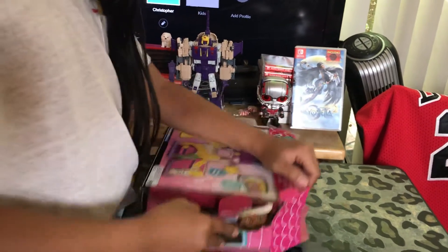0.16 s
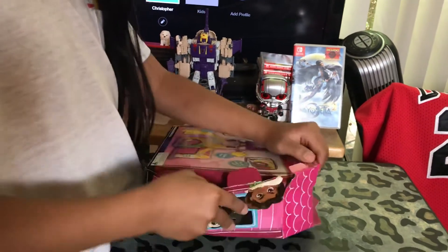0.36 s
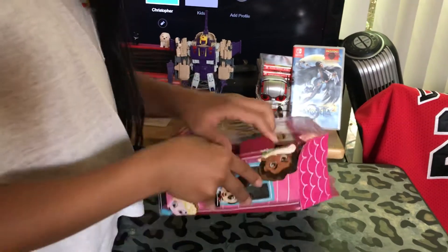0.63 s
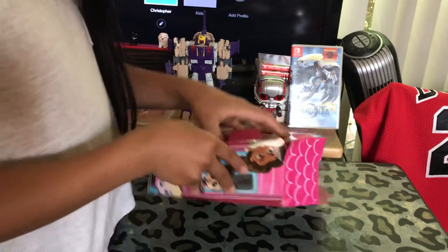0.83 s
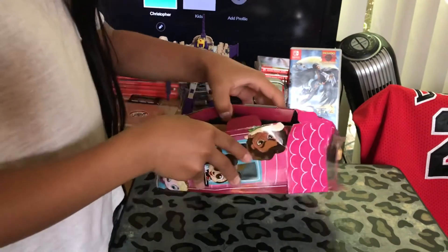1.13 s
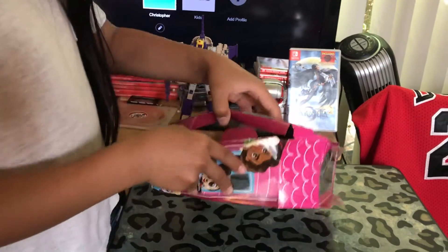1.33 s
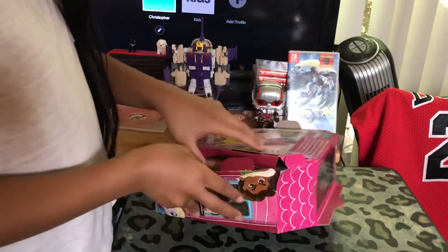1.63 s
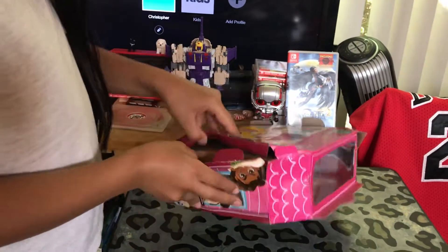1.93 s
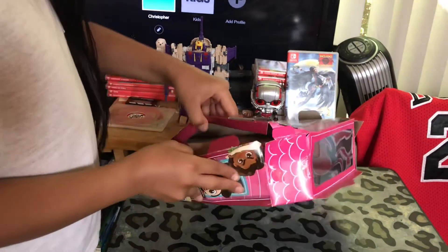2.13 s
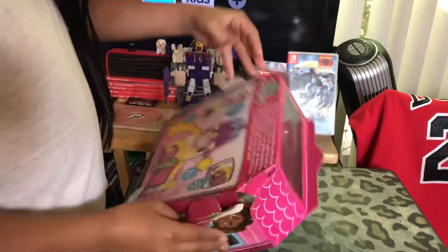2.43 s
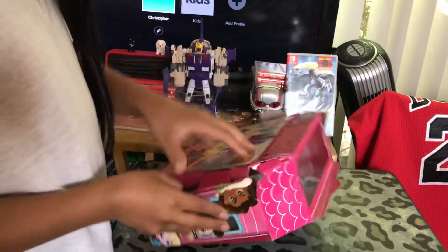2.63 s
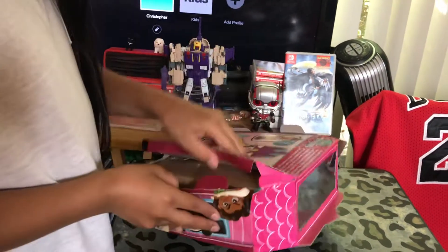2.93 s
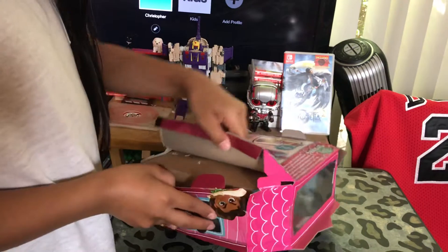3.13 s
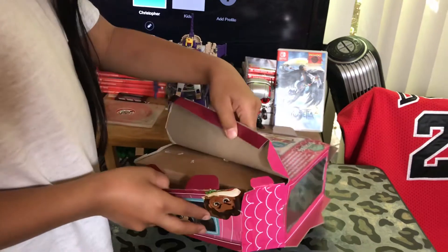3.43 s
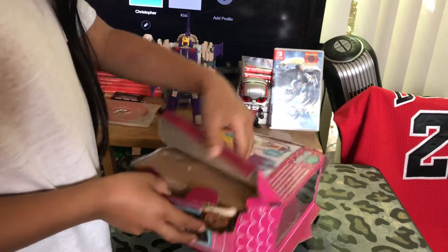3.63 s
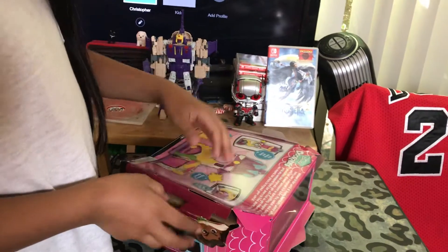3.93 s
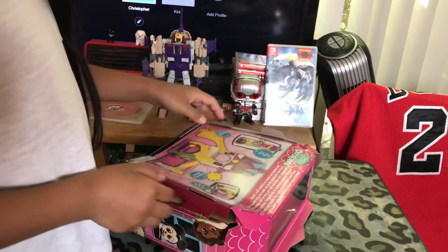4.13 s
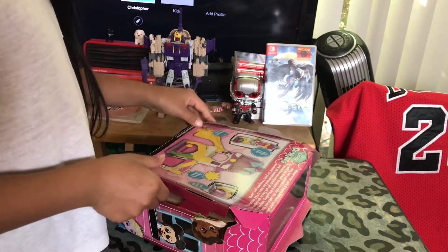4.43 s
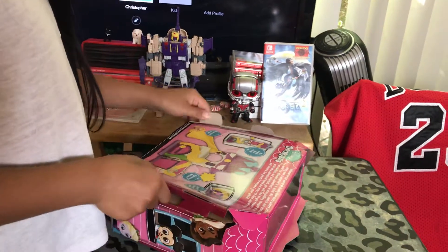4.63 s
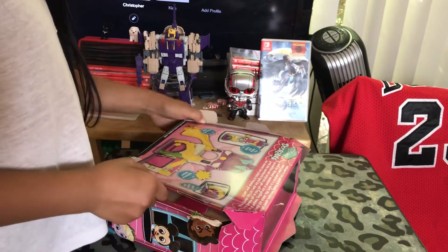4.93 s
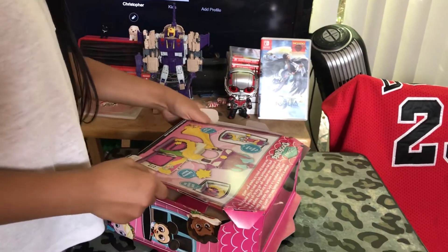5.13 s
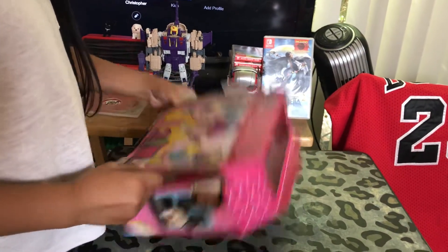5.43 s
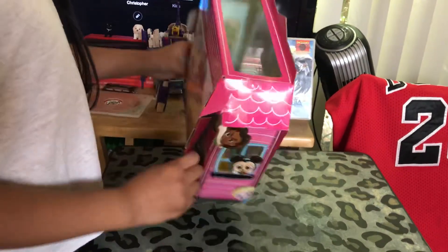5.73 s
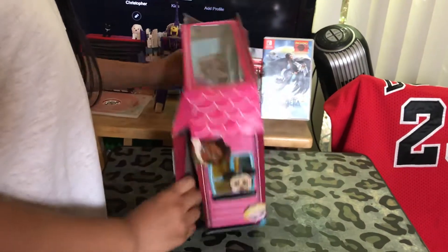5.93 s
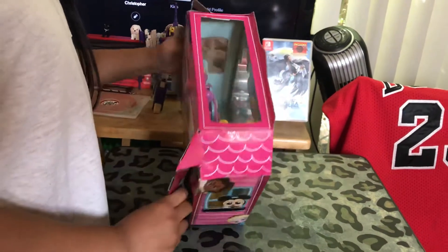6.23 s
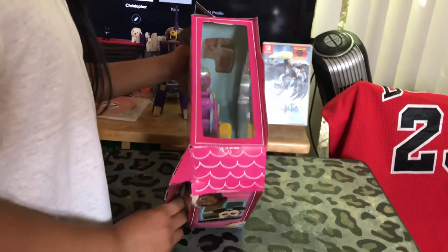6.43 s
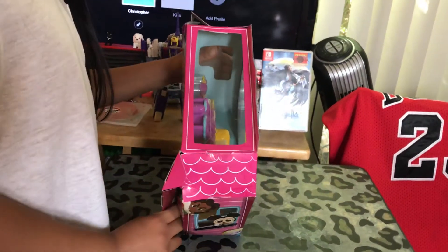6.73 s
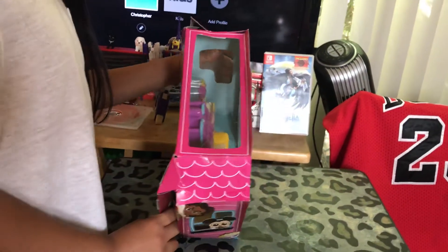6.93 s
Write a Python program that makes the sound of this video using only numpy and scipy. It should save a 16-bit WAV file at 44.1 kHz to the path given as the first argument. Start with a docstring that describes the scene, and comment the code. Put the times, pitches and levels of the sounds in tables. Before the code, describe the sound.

A light, hollow carton is handled on a cloth-covered table. Busy, boxy knocks and dry scraping come first, briefly thinning before a violent burst of cardboard snaps. A glued flap then gives way with fine, crisp ripping and one more crack. The movements become gentle: sparse clicks, skin sliding on card, thin film crinkles and muted bumps. Close single microphone, very short room reflection, steady quiet background.

```python
"""Small furnished room, cloth-covered table: hands turn a hollow cardboard box over, pry at it, tear a glued flap.
Knocks: a click and scattered slips ring panel, hollow and table modes. Snaps: millisecond noise bursts, each pitched.
Handling: random stick-slip grains ring the box and rustle as skin, film and fibres; the table rumbles.
A 35 ms decaying noise tail is the room; steady coloured noise is the quiet floor."""
import sys
import numpy as np
from scipy import signal
from scipy.fft import rfft, irfft
from scipy.io import wavfile

SR = 44100
rng = np.random.default_rng(int(sys.argv[2]) if len(sys.argv) > 2 else 0)


def wav_record(signal):
    """Record a signal, one row per channel, as 16-bit PCM in the file named by sys.argv[1]."""
    frames = np.transpose(np.atleast_2d(signal))
    bounded = np.clip(frames, -1, 1)
    # unit amplitude maps onto the largest positive 16-bit level
    quanta = np.round(bounded * 32767).astype(np.int16)
    wavfile.write(sys.argv[1], SR, quanta)


N = 311787

# quiet floor spectrum, relative: pitch_hz, density_db_per_hz
FLOOR_SPECTRUM = [(18, -41), (30, -12), (56, -13.5), (98, -6), (145, -22), (258, -16), (1090, -25.5),
                  (1270, -28), (1380, -31), (3640, -38.5), (10400, -45.5), (12800, -41), (15800, -45)]
# table rumble over time: time_s, level_db
RUMBLE_LEVEL = [(0.0, -64), (0.77, -66), (2.171, -74), (2.419, -59), (3.309, -74.5), (6.63, -62),
                (7.07, -70)]
# table top under the cloth, relative levels: mode_hz, level_db, t60_s
TABLE_MODES = [(55.3, -11, 0.36), (74.6, 0.5, 0.184), (98, -10, 0.26), (146.3, -5.5, 0.19),
               (174.6, 2, 0.065), (200, 0.5, 0.099)]
# air and walls of the box, relative levels: mode_hz, level_db, t60_s
HOLLOW_MODES = [(258, -7.5, 0.19), (310, 6, 0.063), (390.5, -18, 0.19), (412.2, 0, 0.077),
                (465.7, -3, 0.054), (519, -3, 0.057), (526, -9, 0.031), (636, -6.5, 0.06)]
# stiffer box panels, relative levels: mode_hz, level_db, t60_s
PANEL_MODES = [(685, 0, 0.013), (795, -5.5, 0.05), (843, -12.5, 0.041), (848, -14, 0.15), (915, 1.5, 0.034),
               (1010, -9, 0.079), (1100, 0, 0.033), (1197, -1, 0.023), (1282, -12, 0.07), (1410, -7, 0.026),
               (1515, 8, 0.0067), (1620, -8, 0.049), (1790, 2.5, 0.013), (1862, -6, 0.022),
               (1999, 2, 0.021), (2173, -5, 0.046), (2274, -3.5, 0.014), (2520, -12, 0.012),
               (3040, -21.5, 0.014), (3520, -16, 0.0056)]
# spectrum of snaps and rustle, relative: pitch_hz, density_db_per_hz
BRIGHT_SPECTRUM = [(1290, -30.5), (2200, -1.5), (2840, -3.5), (3460, -5), (3950, -5), (6220, -2),
                   (6920, -4.5), (9400, -5.5), (10400, -9), (11600, -7), (13100, -8.5), (15000, -13),
                   (15800, 4.5)]
# pitch at which the rubbed panel answers best as hands move: time_s, pitch_hz
RUBBED_PITCH = [(0, 1100), (3.8, 1100), (4.0, 2100), (4.6, 1000), (5.2, 1200), (5.5, 2165), (6.35, 2034),
                (6.6, 888), (6.85, 1800), (7.07, 1800)]
# strokes of fingers or flap over card; swell and fade are times for 20 dB:
# peak_s, swell_s, fade_s, panels_db, hollow_db, skin_db, film_db, fibres_db
STROKES = [(0.06, 0.056, 0.034, -40.5, -32.5, -54, -52.5, -45),
           (0.237, 0.1, 0.24, -50, -46.5, -58.5, -57.5, -54.5),
           (.31, 0.077, 0.052, -57, -49.5, -63, -64, -67), (.405, 0.0084, 0.052, -51, -43, -56, -68, -68),
           (.46, 0.048, 0.26, -57, -49, -55, -63, -47.5), (0.635, 0.021, 0.058, -40, -40.5, -47, -49, -40),
           (.82, 0.068, .12, -47.5, -44, -55, -58, -75), (.95, 0.055, 0.15, -50, -39.5, -71, -60, -68),
           (1.046, 0.12, 0.051, -35, -59, -41.5, -46, -35),
           (1.3, 0.063, 0.081, -59.5, -56.5, -90, -72, -76), (1.542, 0.088, 0.12, -43, -44, -51, -52, -43),
           (1.653, 0.03, 0.053, -52, -47.5, -56.5, -66, -48),
           (1.792, 0.03, 0.058, -43, -39, -51.5, -56, -54), (1.869, 0.062, 0.036, -42, -36, -51, -65, -68),
           (1.921, 0.044, 0.069, -48.5, -60, -68, -62, -69), (2.1, 0.59, 0.54, -55, -52.5, -61, -65.5, -68),
           (2.3, 0.047, 0.13, -30.5, -49, -37, -45, -42), (2.399, 0.31, 0.094, -68, -44.5, -71, -74, -42.5),
           (2.62, 0.1, 0.084, -47.5, -40, -57, -58, -56.5), (2.885, 0.1, 0.11, -53.5, -43, -58, -63, -50.5),
           (2.977, 0.076, 0.065, -41.5, -39, -52, -51, -44), (3.1, 0.067, 0.14, -53.5, -53, -61, -55, -54),
           (3.21, 0.021, 0.48, -50, -57, -69, -57, -39.5), (3.29, 0.024, 0.054, -54, -48, -63, -41, -24),
           (3.369, 0.14, 0.044, -49, -52, -52, -37, -30), (3.454, .02, 0.027, -51, -67, -58, -47.5, -33.5),
           (3.699, 0.081, 0.027, -63, -35.5, -73, -62, -80),
           (3.641, 0.096, 0.23, -56.5, -55, -61, -59, -74),
           (3.824, 0.045, 0.051, -38, -32.5, -45, -54, -73), (4.006, 0.1, 0.043, -55.5, -62, -56, -54, -46),
           (4.199, 0.019, 0.13, -62, -53, -58.5, -61, -57), (4.317, 0.03, 0.019, -61, -53, -65.5, -63, -57),
           (4.379, 0.006, 0.034, -48.5, -48.5, -68, -72.5, -59),
           (4.721, 0.43, 0.6, -60.5, -62, -75, -66.5, -70.5),
           (4.828, 0.0095, 0.11, -57, -75, -61, -50.5, -69),
           (4.881, 0.035, 0.024, -53.5, -47, -57, -48, -46),
           (5.02, 0.16, 0.58, -57, -53.5, -58.5, -57.5, -72), (5.149, 0.06, 0.022, -45, -53, -61, -72, -78),
           (5.41, 0.045, 0.071, -46, -46.5, -67.5, -54, -51),
           (5.54, 0.21, 0.12, -55, -54, -54.5, -55, -47.5),
           (5.762, 0.23, 0.55, -57.5, -57.5, -62.5, -60, -54),
           (5.896, 0.061, 0.09, -50, -62, -54, -65, -47.5),
           (6.083, 0.022, 0.028, -53.5, -52, -57.5, -53, -46.5),
           (6.15, 0.068, 0.044, -60, -55, -70, -74, -72), (6.301, 0.27, 0.24, -54, -58, -58, -56.5, -55),
           (6.54, 0.11, 0.27, -55, -49.5, -67, -61, -57), (6.79, 0.11, 0.065, -53.5, -56.5, -69, -82, -57),
           (6.92, 0.22, 0.28, -55, -52, -70, -59, -51.5), (7.04, 0.11, 0.35, -54, -53, -72, -64, -55)]
# hands at rest: panels_db, hollow_db, skin_db, film_db, fibres_db
RESTING_DB = (-89.5, -75.5, -84, -93, -81.5)
# knocks on the box, levels before drive; hollow and thud relative to level_db:
# start_s, level_db, hollow_db, thud_db, contact_ms, favoured_panel_hz, favoured_hollow_hz
KNOCKS = [(0.021, -40, -20, -12, 3.8, 1660, 412), (0.043, -20, -3.5, -14.5, 5.3, 830, 304),
          (0.21, -42.5, 1, -11, 6.3, 834, 403), (0.311, -34, -20, -27, 5, 826, 312),
          (0.389, -24, -4.5, -12, 7.8, 703, 310), (0.431, -16, -42, -29, 2.7, 1100, 366),
          (0.465, -35, -9, -7.5, 4.9, 1100, 296), (0.486, -34, -5, -12, 7.3, 1100, 396),
          (0.538, -37, -6, -16, 3.2, 750, 415), (0.611, -35, -21, -21, 2.55, 1380, 301),
          (0.62, -32, -20, -20, 6.1, 988, 474), (0.698, -44.5, -1, -15, 7.8, 720, 425),
          (0.754, -34.5, -1.5, -14, 12, 972, 500), (0.774, -19, -16, -26.5, 12.5, 1140, 330),
          (0.823, -28, -3, -7, 3.6, 1010, 301), (0.872, -52, 18.5, -3, 3.9, 915, 415),
          (0.918, -12, -12.5, -29, 2.6, 760, 638), (1.038, -18.5, -10, -20, 3.7, 1000, 285),
          (1.062, -13.5, -5, -24.5, 5.5, 1010, 404), (1.392, -48.5, 2, -3, 3.9, 859, 242),
          (1.438, -35, -1, -9.5, 8.8, 1230, 440), (1.498, -34, -10, -24, 5.4, 1540, 334),
          (1.51, -28, -12, -44, 2.5, 1600, 404), (1.536, -32.5, -26, -33, 3.8, 2000, 546),
          (1.756, -37.5, -5, -14, 1.7, 1050, 515), (1.841, -37.5, 7.5, -32, 5.3, 708, 550),
          (1.858, -22.5, -3.5, -39, 4.4, 2250, 447), (1.897, -29.5, -0.5, -36, 9, 703, 474),
          (1.911, -22, -12, -49, 3.1, 2290, 312), (1.934, -41, 3, -30, 2.6, 716, 316),
          (2.234, -20, -15, -34, 3.9, 1260, 410), (2.264, -16, -13, -11, 12, 888, 581),
          (2.274, 2.5, -14.5, -34, 3.9, 880, 285), (2.312, -4.5, -18, -19.5, 6.8, 1600, 398),
          (2.35, -28, 3, -12, 6.5, 1240, 307), (2.428, -22, -4.5, -30, 9.5, 870, 310),
          (2.567, -10, -1, -20, 12, 1140, 620), (2.676, -26.5, -7.5, -22.5, 12, 700, 380),
          (2.74, -39.5, -4.5, -35, 7.4, 2520, 468), (3.031, -3.5, -6, -49, 1.7, 830, 470),
          (3.184, -36.5, -34, -36, 1.9, 2110, 638), (3.207, -35, -14, -30, 3.7, 1590, 624),
          (3.278, -36, -22, -22, 3.1, 1740, 310), (3.318, -23.5, -15.5, -22, 3.4, 1070, 407),
          (3.589, -39, -11, -13, 2.4, 2140, 554), (3.66, -12.5, -11.5, -28.5, 1.64, 1010, 475),
          (3.77, -40, -22, -24, 3.8, 2040, 635), (3.785, -37, -23, -16, 2.8, 794, 310),
          (3.819, -37, -21, -10, 6.2, 1040, 310), (4.124, -35.5, -4, -31, 2.7, 2420, 377),
          (4.135, -45, 5, -32, 3.2, 2170, 398), (4.19, -42, -5, -25.5, 4.3, 1360, 300),
          (4.268, -41, -9, -30, 6.7, 807, 310), (4.683, -35, -8.5, -30, 6.3, 704, 540),
          (4.768, -44.5, -5, -1, 5.8, 1360, 288), (4.932, -36.5, -24, -17, 18, 2360, 248),
          (4.972, -34.5, -26, -17, 9.3, 853, 326), (5.02, -44, -19, -29, 2.3, 1790, 563),
          (5.13, -39.5, -4.5, -19, 5.2, 1160, 301), (5.285, -38, -16, -45, 5.3, 1350, 239),
          (5.406, -25, -12, -21, 2.1, 824, 314), (5.537, -30.5, -35, -40, 1.2, 2220, 406),
          (5.592, -34.5, -14, -36.5, 4.4, 870, 310), (5.895, -51.5, -17.5, -12, 2.5, 1580, 320),
          (6.051, -47, 0, -15, 2.1, 738, 401), (6.084, -34.5, -2.5, -15, 6.6, 840, 406),
          (6.134, -39, -0.5, -23, 6.4, 713, 390), (6.199, -53, 9.5, -22, 1.5, 848, 416),
          (6.24, -54, 9.5, -13, 1.3, 786, 541), (6.278, -55.5, 15, -22, 1.3, 1100, 540),
          (6.348, -45, 7, -34, 3.4, 713, 436), (6.383, -29, 4, -15, 4.5, 710, 516),
          (6.41, -50, -16, -21, 3, 864, 484), (6.5107, -25, -8, -13, 5.6, 840, 476)]
# snaps of fibres, glue and film, levels before drive: start_s, level_db, pitch_hz, decay_ms
TICKS = [(0.047, -15, 3600, 4.9), (0.3113, -34, 7000, 3.4), (0.391, -33.5, 3810, 2.5),
         (0.431, -11.5, 3480, 4.3), (0.4884, -26.5, 7240, 3.9), (0.606, -27.5, 6400, 8.6),
         (0.7541, -25.5, 4040, 13), (0.7727, -17, 4200, 7.5), (0.847, -32.5, 3400, 3.9),
         (0.918, -21, 3820, 6.2), (1.0375, -18, 7100, 3.2), (1.0638, -12, 3660, 3.7),
         (1.4385, -30.5, 5460, 3.4), (1.51, -22, 4600, 2.6), (1.5345, -17.5, 7200, 12),
         (1.6393, -35, 9600, 3), (1.8593, -22, 4200, 1.4), (1.897, -29, 5200, 2.5),
         (1.9063, -20, 2930, 4.5), (2.2331, -6.5, 8500, 1.4), (2.2628, -6, 3900, 10),
         (2.2734, 0, 2640, 9.3), (2.311, -2.5, 5100, 6.6), (2.351, -22, 6350, 2.3), (2.424, -22, 5940, 9.1),
         (2.571, -17.5, 6130, 10), (2.676, -19.5, 4040, 7.2), (2.7438, -34.5, 3970, 2.5),
         (2.983, -25, 5950, 6), (3.0329, -23, 2330, 0.43), (3.1846, -22.5, 6160, 0.5),
         (3.213, -22, 11300, 1.4), (3.242, -22, 11300, 0.97), (3.267, -22, 8040, 7),
         (3.2818, -14, 7460, 2.9), (3.289, -20, 6340, 4.9), (3.301, -18, 5900, 6.8),
         (3.3454, -34, 6550, 3.8), (3.3588, -32, 6270, 2.5), (3.3687, -29, 5300, 1.8),
         (3.3832, -23, 6170, 2.4), (3.4, -26.5, 11900, 0.65), (3.504, -35, 5700, 0.73),
         (3.4241, -31, 6740, 2), (3.458, -27.5, 5980, 2.2), (3.49, -27, 6200, 2), (3.661, -16, 5230, 1.45),
         (3.771, -34.5, 4540, 3.4), (3.784, -26.5, 3000, 9.9), (3.8142, -24, 6020, 1.9),
         (3.84, -31, 2280, 1.5), (3.906, -41, 4960, 1.8), (3.998, -45, 2140, 3), (4.012, -34, 5900, 1.8),
         (4.125, -33.5, 2350, 2.5), (4.294, -47, 3000, 1), (4.137, -41, 6200, 3), (4.692, -38.5, 6500, 1.5),
         (4.2688, -40, 5350, 2.4), (4.385, -35, 5170, 2.1), (4.877, -41.5, 6000, 2),
         (4.842, -44, 2000, 1.5), (4.826, -34.5, 6600, 7.4), (4.933, -29.5, 3300, 7.3),
         (4.801, -45, 5500, 1.5), (4.948, -48, 6000, 0.8), (4.978, -25, 5900, 0.98),
         (5.107, -44, 6000, 1.2), (5.216, -41.5, 5600, 1.4), (5.378, -38, 5550, 1.5),
         (4.9715, -27, 6200, 2.3), (5.1315, -29.5, 5720, 2.7), (5.2565, -42.5, 5400, 4.4),
         (5.402, -28.5, 5170, 4.1), (5.431, -45, 9000, 1.5), (5.47, -33, 6560, 4), (5.62, -47, 7000, 1.5),
         (5.629, -43.5, 6970, 0.8), (5.7338, -40, 5700, 1.8), (6.504, -28, 2900, 4.8),
         (6.596, -33.5, 6300, 3), (6.921, -37, 6940, 1.8)]

FLOOR_DB = -62
ROOM_T60_S, ROOM_FIRST_S, ROOM_DB, ROOM_CUT_HZ = 0.035, 0.004, -21, 11000
GRIP_S = 0.04   # interval between changes of grip
SKIN_LOW_HZ, SKIN_HIGH_HZ = 1800, 4420
FILM_LOW_HZ, FILM_HIGH_HZ = 4960, 6760
FIBRE_CUT_HZ = 8700
# after a knock the card goes on shifting in the hands; loose card answers low
SHUDDER_PANEL_DB, SHUDDER_HOLLOW_DB, SHUDDER_FADE_S, SHUDDER_HZ = -22, -13, 0.05, 850
# after a snap the fibres go on rustling
AFTER_SKIN_DB, AFTER_FILM_DB, AFTER_FIBRE_DB, AFTER_FADE_S = -30, -31.5, -35, 0.041
PANEL_DRIVE_DB, HOLLOW_DRIVE_DB, THUD_DRIVE_DB, TICK_DRIVE_DB = -0.5, 3, 4, 17.5
THUD_DELAY_S = 0.0024
SOFT_PANEL_HZ, SOFT_HOLLOW_HZ = 3000, 1200   # soft fingertips: knocks carry little above
BASS_CUT_HZ, PEAK_LIMIT, TOP_STOP_HZ = 38, 0.93, 16100


def from_db(db):
    """Decibels to gain."""
    return 10 ** (np.asarray(db) / 20)


def rms_one(x):
    """Scale to rms 1."""
    return x / np.sqrt(np.mean(x ** 2) + 1e-20)


def energy_one(x):
    """Scale to energy 1."""
    return x / np.sqrt(np.sum(x ** 2))


def lowpass(x, order, cut_hz):
    """Butterworth low-pass."""
    return signal.lfilter(*signal.butter(order, cut_hz, fs=SR), x)


def highpass(x, cut_hz):
    """Second-order Butterworth high-pass."""
    return signal.lfilter(*signal.butter(2, cut_hz, "high", fs=SR), x)


def drift(rate_hz):
    """Slow chance: noise twice through a one-pole low-pass at a tenth of the sample rate; rms 1."""
    r = np.exp(-20 * np.pi * rate_hz / SR)
    noise = rng.standard_normal(N // 10 + 4002)
    slow = signal.lfilter([1], [1, -2 * r, r * r], noise)[4000:]   # drop the settling
    return np.interp(np.arange(N) / 10, np.arange(len(slow)), rms_one(slow))


def colour(x, spectrum):
    """Minimum-phase filter with the given spectrum; a unit click keeps energy 1."""
    hz, db = np.transpose(spectrum)
    grid_hz = np.maximum(np.arange(2049) * SR / 4096, 1)
    log_gain = np.interp(np.log(grid_hz), np.log(hz), db) * np.log(10) / 20
    cepstrum = irfft(log_gain)
    cepstrum[1:2048] *= 2   # fold to make it causal
    cepstrum[2049:] = 0
    taps = irfft(np.exp(rfft(cepstrum)))
    return signal.fftconvolve(x, energy_one(taps))[:N]


def modes(force, table, since_s, vary_db, favoured_hz=None, focus_db=0):
    """A force rings all modes of a body; from each moment in since_s, grip and spot give new strengths."""
    table = np.array(table)
    part = np.searchsorted(np.asarray(since_s) * SR, np.arange(N), side="right") - 1
    # the sign of vary_db only mirrors the chance
    strength_db = vary_db * rng.standard_normal((len(since_s), len(table)))
    if favoured_hz is not None:   # focus_db lost per octave from the favoured pitch
        octaves = np.abs(np.log2(table[:, 0] / favoured_hz[:, None]))
        strength_db -= focus_db * octaves
    mean_power = np.mean(from_db(2 * strength_db), axis=1, keepdims=True)
    strengths = from_db(strength_db) / np.sqrt(mean_power)
    out = 0
    for k, (hz, db, t60_s) in enumerate(table):
        r = from_db(-60 / (t60_s * SR))
        w = 2 * np.pi * hz / SR
        struck = from_db(db) * strengths[part, k] * force + 1e-18
        out = out + signal.lfilter([0, np.sin(w)], [1, -2 * r * np.cos(w), r * r], struck)
    out = highpass(out, 1.4 * table[0, 0])   # little is radiated low down
    return out / np.sqrt(np.sum(from_db(2 * table[:, 1])))


def bursts(start_s, level_db, decay_ms, first):
    """Each contact is a first click plus a dying scatter of slips; energy 1 before its level gain."""
    size = 2000
    out = np.zeros(N + size)
    t = np.arange(size) / SR
    scatter = rng.standard_normal((len(start_s), size)) ** 3   # cubed: sparse, spiky
    for s, db, ms, slips in zip(start_s, level_db, decay_ms, scatter):
        push = energy_one(slips * np.exp(-1000 * t / np.clip(ms, .2, 20)))
        push[0] += first * np.sign(push[0])
        at = int(s * SR)
        out[at:at + size] += from_db(db) * energy_one(push)
    return out[:N]


def grains(per_s, spread_db, clump_db, clump_hz):
    """Stick-slip: random clicks of uneven size that come in clumps; rms 1."""
    sizes = from_db(spread_db * np.minimum(rng.exponential(1, N), 5))
    signs = rng.choice([-1, 1], N)
    born = rng.random(N) < per_s / SR
    return rms_one(sizes * signs * born * from_db(clump_db * drift(clump_hz)))


def creases(clicks, low_hz, high_hz, cycles, count):
    """Patches of different size crackle in turn; a click rings at its patch's pitch, 60 dB down after cycles."""
    out = 0
    dealt = rng.integers(0, count, N)
    for k, hz in enumerate(np.geomspace(low_hz, high_hz, count)):
        r = from_db(-60 * hz / (cycles * SR))
        mine = clicks * (dealt == k) * from_db(4.9 * drift(7.1))
        poles = [1, -2 * r * np.cos(2 * np.pi * hz / SR), r * r]
        out = out + signal.lfilter([1, 0, -1], poles, mine + 1e-18)
    return out


def emphasis(x, pitch_hz, share, breadth):
    """A broad resonance, centre held for 64 samples at a time, added to a share of the plain sound."""
    out, state = share * x, np.zeros(2)
    for i in range(0, N, 64):
        centre_hz = np.clip(pitch_hz[i], 1500, 14000)
        r = np.exp(-np.pi * breadth * centre_hz / SR)
        zeros = np.array([1, 0, -1]) * (1 - r * r) / 2
        poles = [1, -2 * r * np.cos(2 * np.pi * centre_hz / SR), r * r]
        rung, state = signal.lfilter(zeros, poles, x[i:i + 64], zi=state)
        out[i:i + 64] += rung
    return out


def swells(peak_s, swell_s, fade_s, level_db):
    """Power of movements that grow to a peak and fade, evenly in decibels; powers add."""
    step_s = np.arange(0, N + 32, 32)[:, None] / SR
    before = (peak_s - step_s) / np.clip(swell_s, .001, 2)
    after = (step_s - peak_s) / np.clip(fade_s, .001, 2)
    fall_db = 20 * np.maximum(before, after)
    power = np.sum(from_db(2 * (level_db - fall_db)), axis=1)
    return np.interp(np.arange(N) / SR, step_s[:, 0], power)


def quiet_floor():
    """Steady noise with the floor spectrum."""
    return from_db(FLOOR_DB) * colour(rng.standard_normal(N), FLOOR_SPECTRUM)


def room(x):
    """Dull noise tail that dies away, starting after the first reflection."""
    t = np.arange(SR // 2) / SR
    tail = rng.standard_normal(len(t)) * from_db(-60 * t / ROOM_T60_S) * (t > ROOM_FIRST_S)
    tail = lowpass(tail, 1, ROOM_CUT_HZ)
    return from_db(ROOM_DB) * signal.fftconvolve(x, energy_one(tail))[:N]


def table_rumble(grips_s):
    """Noise rings the table top's modes, with the level following the rumble table."""
    level_db = np.interp(np.arange(N) / SR, *np.transpose(RUMBLE_LEVEL))
    rumble = modes(rng.standard_normal(N), TABLE_MODES, grips_s, vary_db=4.5)
    return rms_one(rumble) * from_db(level_db)


def effort():
    """Gains of panels, hollow, skin, film, fibres from strokes, aftermaths and rest; last the panel shudder."""
    peak_s, swell_s, fade_s, *levels_db = np.transpose(STROKES)
    knock_s, knock_db, hollow_db = np.transpose(KNOCKS)[:3]
    tick_s, tick_db = np.transpose(TICKS)[:2]
    shudder = swells(knock_s, 0, SHUDDER_FADE_S, knock_db + SHUDDER_PANEL_DB)
    aftermaths = [0, swells(knock_s, 0, SHUDDER_FADE_S, knock_db + hollow_db + SHUDDER_HOLLOW_DB)]
    for after_db in (AFTER_SKIN_DB, AFTER_FILM_DB, AFTER_FIBRE_DB):
        aftermaths.append(swells(tick_s, 0, AFTER_FADE_S, tick_db + after_db))
    gains = []
    for db, aftermath, rest_db in zip(levels_db, aftermaths, RESTING_DB):
        stroke = swells(peak_s, swell_s, fade_s, db)
        gains.append(np.sqrt(stroke + aftermath + from_db(2 * rest_db)))
    return gains + [np.sqrt(shudder)]


def handling():
    """Fingers slide and press: grains excite the box, finer grains rustle, the table rumbles."""
    panel_gain, hollow_gain, skin_gain, film_gain, fibre_gain, shudder_gain = effort()
    grips_s = np.arange(0, N / SR, GRIP_S)   # hands damp other modes as they move
    rubbed_hz = np.interp(grips_s, *np.transpose(RUBBED_PITCH))
    shudder_hz = np.full(len(grips_s), SHUDDER_HZ)

    rub = grains(2500, spread_db=1.5, clump_db=3.5, clump_hz=33)
    press = grains(500, spread_db=1.0, clump_db=2.5, clump_hz=43)
    skin = grains(7700, spread_db=2.0, clump_db=2.0, clump_hz=30)   # an even slide
    skin = creases(skin, SKIN_LOW_HZ, SKIN_HIGH_HZ, cycles=12.0, count=9)   # soft skin is dull
    film = grains(6500, spread_db=3.0, clump_db=4.0, clump_hz=28)
    fibres = grains(9000, spread_db=1.5, clump_db=2.0, clump_hz=30)   # finest and brightest
    film = creases(film, FILM_LOW_HZ, FILM_HIGH_HZ, cycles=9.2, count=9)
    fibres = highpass(fibres, FIBRE_CUT_HZ)

    panels = modes(rub, PANEL_MODES, grips_s, vary_db=6.0, favoured_hz=rubbed_hz, focus_db=7.5)
    # the rub's grains in reverse order
    shudder = modes(rub[::-1], PANEL_MODES, grips_s, vary_db=5.0, favoured_hz=shudder_hz, focus_db=15.5)
    hollow = modes(press, HOLLOW_MODES, grips_s, vary_db=6.5)

    out = rms_one(panels) * panel_gain
    out += rms_one(shudder) * shudder_gain
    out += rms_one(hollow) * hollow_gain
    out += rms_one(colour(skin, BRIGHT_SPECTRUM)) * skin_gain
    out += rms_one(colour(film, BRIGHT_SPECTRUM)) * film_gain
    out += rms_one(colour(fibres, BRIGHT_SPECTRUM)) * fibre_gain
    return out + table_rumble(grips_s)


def knocks():
    """Every knock drives panels, hollow and, slightly later, the table."""
    s, db, hollow_db, thud_db, contact_ms, panel_hz, hollow_hz = np.transpose(sorted(KNOCKS))
    early_s = s - .001   # new strengths are set just before contact
    panel_push = bursts(s, db + PANEL_DRIVE_DB, contact_ms, first=0.55)
    panels = modes(panel_push, PANEL_MODES, early_s, vary_db=-1.0, favoured_hz=panel_hz, focus_db=13.5)
    hollow_push = bursts(s, db + hollow_db + HOLLOW_DRIVE_DB, contact_ms, first=0.9)
    hollow = modes(hollow_push, HOLLOW_MODES, early_s, vary_db=1.5, favoured_hz=hollow_hz, focus_db=19.0)
    table_push = bursts(s + THUD_DELAY_S, db + thud_db + THUD_DRIVE_DB, 2 * contact_ms, first=1.3)
    thud = modes(table_push, TABLE_MODES, early_s, vary_db=-2.5)
    return lowpass(panels, 2, SOFT_PANEL_HZ) + lowpass(hollow + thud, 2, SOFT_HOLLOW_HZ)


def ticks():
    """A fibre or fold of film lets go within a few milliseconds, each with a pitch of its own."""
    s, db, pitch_hz, decay_ms = np.transpose(sorted(TICKS))
    latest = np.searchsorted((s - .002) * SR, np.arange(N)) - 1
    snaps = bursts(s, db + TICK_DRIVE_DB, decay_ms, first=0.34)
    snaps = emphasis(snaps, pitch_hz[latest], share=0.37, breadth=0.2)
    return colour(snaps, BRIGHT_SPECTRUM)


def scene():
    """Box, floor and room at one microphone."""
    box = knocks() + ticks() + handling()
    floor = quiet_floor()
    return (box + room(box) + floor)[None]


def record(dry):
    """The microphone loses the deepest bass, peaks are rounded, the top is cut steeply."""
    x = highpass(dry, BASS_CUT_HZ)
    x = x / (1 + np.abs(x / PEAK_LIMIT) ** 4) ** .25
    return signal.sosfilt(signal.cheby2(14, 60, TOP_STOP_HZ, fs=SR, output="sos"), x)


dry = scene()
out = record(dry)
wav_record(out)
```